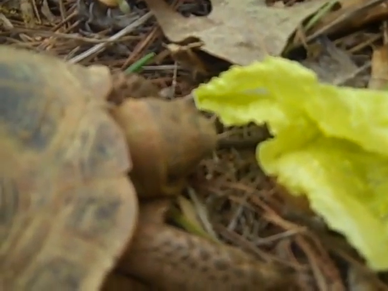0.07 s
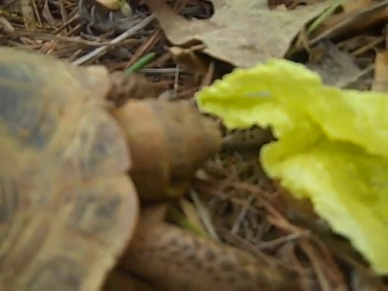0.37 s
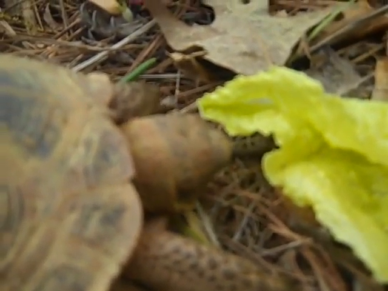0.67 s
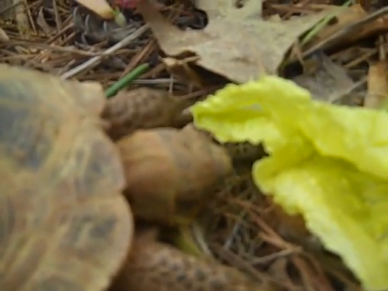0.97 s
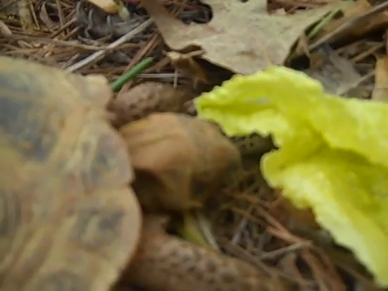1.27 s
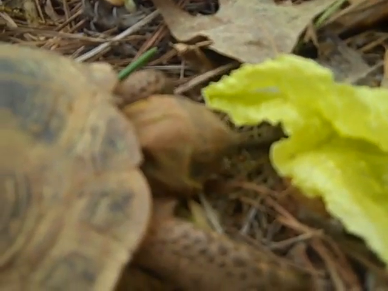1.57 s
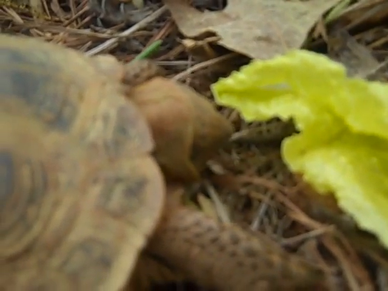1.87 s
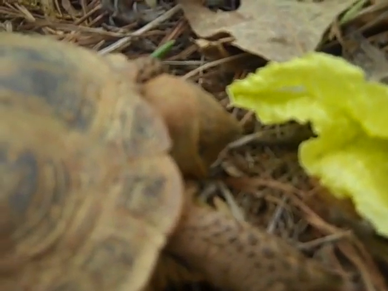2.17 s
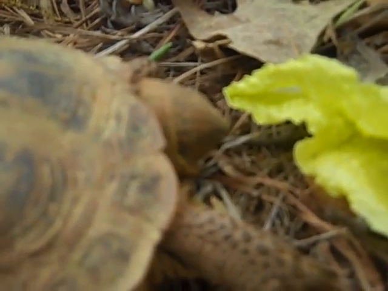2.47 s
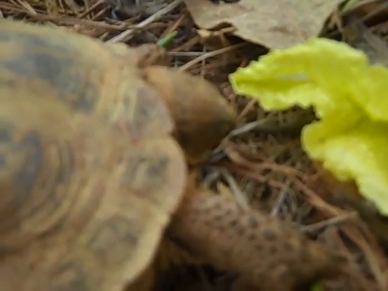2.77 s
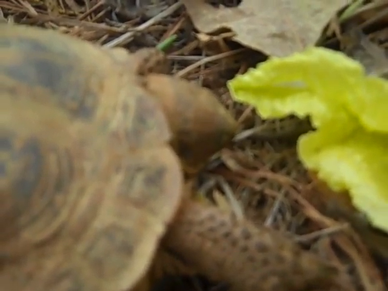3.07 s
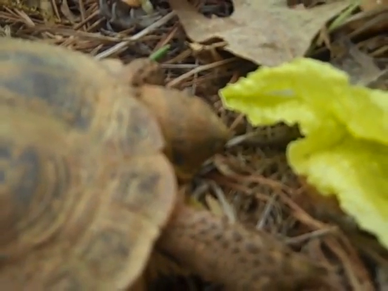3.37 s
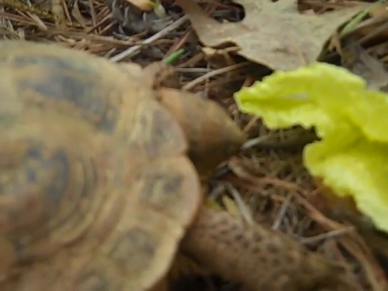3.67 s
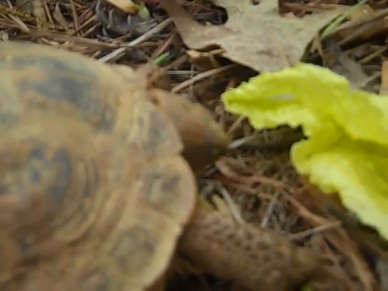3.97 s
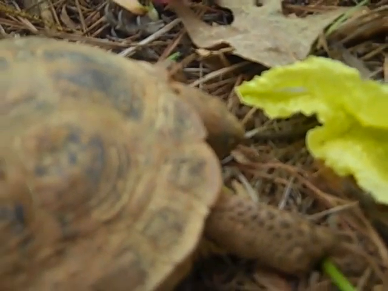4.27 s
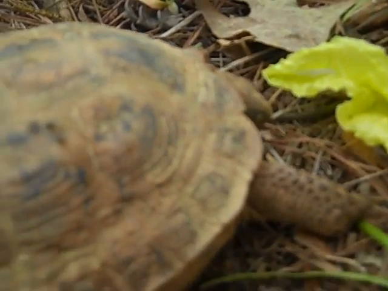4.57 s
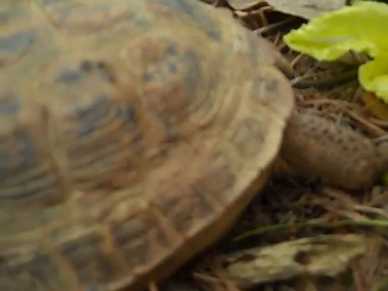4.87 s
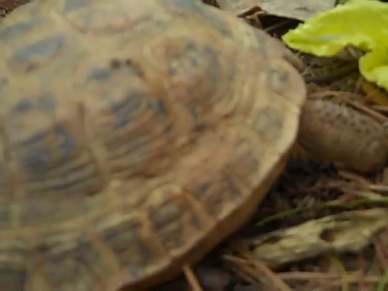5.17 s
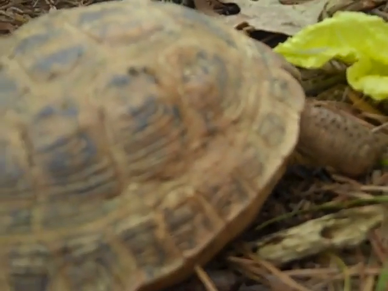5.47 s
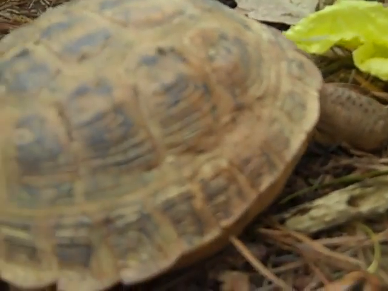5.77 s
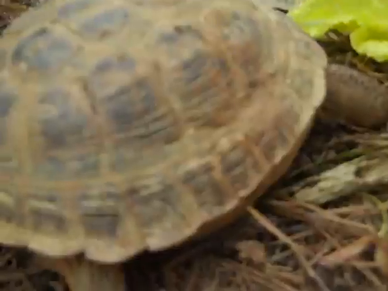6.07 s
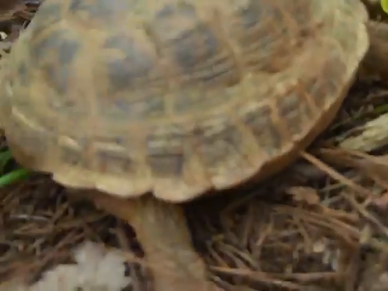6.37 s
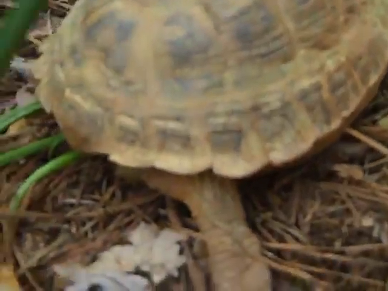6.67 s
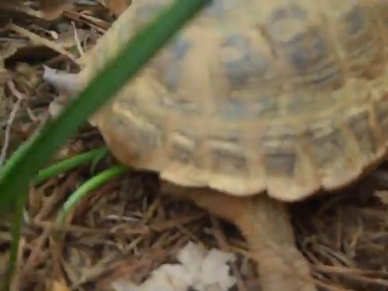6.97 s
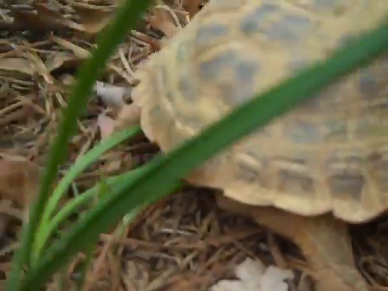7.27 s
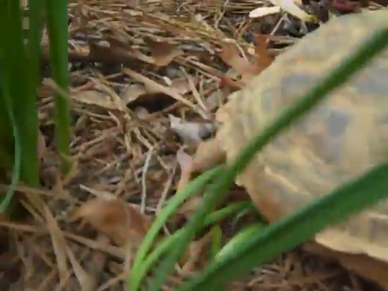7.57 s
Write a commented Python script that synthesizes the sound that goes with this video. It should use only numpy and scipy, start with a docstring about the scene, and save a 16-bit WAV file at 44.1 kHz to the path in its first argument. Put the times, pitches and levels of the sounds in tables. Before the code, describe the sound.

At the quiet edge of a wood, wind bumps and rumbles on the microphone in irregular gusts. A bird starts a rapid, high trill, grows louder and finishes with a few sliding notes, while thin whistles come from distant birds. Nearby, dry needles slide and twigs click under a moving tortoise. After the song, the gusts carry on with scattered light snaps, one short scrape and a few tiny leaf crunches near the end.

```python
"""Tortoise at the edge of a wood

A tortoise shifts over dry pine needles and leaves: needles slide and snap, and leaves crunch.
A songbird sings a swelling trill that ends in slurred notes, and other birds whistle far off,
all gliding sine tones that echo among the trunks. Light gusts buffet the microphone's two ports
with low, lumpy turbulence over a quiet outdoor hush."""
import sys
import numpy as np
from scipy import signal
from scipy.fft import rfft, irfft
from scipy.io import wavfile
from scipy.ndimage import uniform_filter1d

SR = 44100
rng = np.random.default_rng(int(sys.argv[2]) if len(sys.argv) > 2 else 0)


def waveform_to_disk(signal):
    """Save audio, clipped to [-1, 1], as 16-bit WAV at the path in sys.argv[1]."""
    frames = np.transpose(np.atleast_2d(signal))
    scaled = np.clip(frames, -1, 1) * 32767
    samples = np.round(scaled).astype(np.int16)
    wavfile.write(sys.argv[1], SR, samples)


N = 335601
T = np.arange(N) / SR
ENVELOPE_T = T[::20]   # a coarser clock for envelopes

# Levels are set ahead of each layer's fader. Pan is left minus right, so positive leans left.
# The tortoise pushes through the litter. Each row: start in seconds, length in seconds, level in dB.
PUSHES = [(0.022, 0.13, -51.5), (0.442, 0.028, -47.5), (1.16, 0.1, -52), (1.287, 0.29, -53),
          (1.577, 0.43, -55), (2.437, 0.16, -55.5), (4.15, 0.078, -55.5), (4.357, 0.25, -58.5),
          (5.413, 0.28, -58.5), (6.775, 0.048, -56.5), (7.425, 0.021, -53.5)]
# A stiff blade scrapes past. Each row: time in seconds, level in dB.
SCRAPE_ENVELOPE = [(5.53, -82), (5.6, -57), (5.65, -49), (5.675, -46), (5.695, -50), (5.72, -76)]
# The tone of sliding needles. Each row: frequency in Hz, gain in dB.
NEEDLE_EQ = [(800, -24), (2000, -4.5), (3500, -7), (5200, -5), (6600, 4.5), (7900, 1), (9500, -15.5),
             (14500, -18)]
# Needles and twigs snap. Each row: start in seconds, peak in dB, pan in dB, own ring in Hz.
TWIG_SNAPS = [(0.136, -32, 0, 6400), (0.1422, -31, 4, 8600), (0.2572, -29.5, -1, 2000),
              (0.4855, -35, 6, 7000), (0.709, -28.5, -12, 6360), (1.28, -27, -6, 5230),
              (1.3137, -30.5, -2, 7950), (1.341, -29, 0, 5350), (1.4968, -29, 3, 8100),
              (1.504, -21, -2, 6800), (1.6654, -24, -8, 6300), (1.836, -37, 3, 5400),
              (1.8565, -30, -9, 6400), (2.1028, -30, -2, 5240), (2.45, -25.5, 1, 7500),
              (4.158, -38, -2, 5040), (4.4175, -35, 2, 6300), (4.4824, -37, -5, 6700),
              (4.5407, -38, -11, 6400), (4.644, -33.5, -10, 6200), (4.7195, -39, 1, 7800),
              (5.917, -38, -5, 7200)]
# Leaves crushed underfoot. Each row: start in seconds, length in seconds, level in dB, pan in dB.
LEAF_CRUNCHES = [(0.399, 0.0093, -37, 0), (1.486, 0.051, -43, 1), (7.266, 0.0052, -40, 8),
                 (7.279, 0.027, -51, 4), (7.336, 0.011, -47, -7), (7.364, 0.0039, -44.5, -13),
                 (7.394, 0.0078, -46.5, -4)]
# The tone of a breaking leaf. Each row: frequency in Hz, gain in dB.
LEAF_EQ = [(1500, -14.5), (4000, -9.5), (6600, 1), (8200, 0.5), (10500, -18), (14500, -19)]
# One trill syllable, a dip and an upward flick. Each row: offset in seconds, pitch in Hz, level in dB.
TRILL_SYLLABLE = [(-.002, 4134, -7), (.005, 3928, -0.5), (.0105, 3755, -1.5), (.013, 3980, -11),
                  (.016, 4900, -4), (.019, 5100, -8), (.024, 5170, 3), (.029, 5370, 3), (.033, 5400, -12)]
# The trill swells and sags. Each row: time in seconds, level in dB, pitch ratio.
TRILL_EFFORT = [(.767, -57, 1.04), (1.04, -46.5, .99), (1.22, -38.5, 0.97), (1.42, -35, 1.003),
                (1.54, -31.5, 1.01), (1.8, -30.5, 1.006), (2.07, -33, .99), (2.18, -36.5, 0.98),
                (2.238, -42.5, 1.03)]
# The song's slurred ending. Each row: start and length in seconds, first, middle and last pitch in Hz,
# level in dB.
CLOSING_NOTES = [(2.102, 0.087, 4350, 3610, 3290, -45), (2.27, 0.053, 5300, 5000, 4060, -39),
                 (2.344, 0.081, 4520, 3880, 3310, -34.5), (2.493, 0.035, 4900, 5170, 5240, -46),
                 (2.53, 0.046, 5100, 4690, 4010, -33), (2.563, 0.026, 4850, 4840, 4500, -41),
                 (2.6, .062, 4480, 4000, 3410, -30), (2.716, 0.058, 5330, 5010, 4820, -37.5),
                 (2.76, 0.046, 4950, 3790, 3250, -37), (2.803, 0.068, 3600, 3930, 4350, -37),
                 (2.922, 0.034, 5020, 4790, 4630, -42), (2.957, 0.045, 4920, 4750, 4750, -47)]
# Distant birds. Each row: start and end in seconds, first and last pitch in Hz, level in dB.
FAR_CALLS = [(0.451, 0.712, 2217, 1840, -62.5), (0.509, 0.58, 7600, 7630, -51.5),
             (0.966, 1.05, 6620, 5550, -49), (1.071, 1.202, 7610, 7430, -53),
             (1.195, 1.476, 2750, 2286, -58.5), (2.846, 2.917, 7000, 6930, -51.5),
             (5.674, 5.754, 7030, 7350, -51.5), (5.9, 6.06, 6820, 6600, -60)]
# Gusts on the microphone. Each row: start in seconds, length in seconds, level in dB, pan in dB.
WIND_GUSTS = [(0.072, 0.02, -17, -8), (0.16, 0.6, -26, -1), (0.948, 0.046, -32.5, -3.5),
              (1.208, 0.12, -31.5, -21), (1.373, 0.019, -24.5, -6), (1.474, 0.12, -32.5, -1),
              (1.906, 0.15, -36.5, -2.5), (2.342, 0.024, -30, -2), (2.484, 0.11, -12.5, -7),
              (2.6, 0.14, -20.5, -2.5), (2.738, 0.04, -20.5, -0.5), (2.814, 0.14, -22, -5),
              (3.162, 0.12, -28.5, -0.5), (3.474, 0.11, -30, -6), (3.628, 0.16, -23.5, -5),
              (3.823, 0.01, -24, 0), (4.194, 0.012, -36, -20), (4.382, 0.051, -24, 3.5),
              (4.504, .37, -32.5, 1), (5.165, 0.068, -25.5, 8), (5.24, 0.068, -29.5, 3),
              (5.446, 0.045, -30.5, -0.5), (5.697, 0.048, -27.5, 6.5), (5.834, 0.057, -29.5, -5.5),
              (6.123, 0.061, -35, -2), (6.283, 0.18, -43, -6), (6.778, 0.022, -27.5, 5),
              (6.979, 0.17, -28, 6), (7.196, 0.21, -25, 4), (7.469, 0.17, -25.5, -4)]
# The tone of large and of small eddies. Each row: frequency in Hz, gain in dB.
LARGE_EDDY_EQ = [(10, 7.5), (28, 1), (55, 4.0), (100, 3.5), (165, -2.5), (240, -13.5), (330, -20.0),
                 (500, -48.0), (900, -50.0), (3000, -93)]
SMALL_EDDY_EQ = [(60, 23.5), (170, 12.0), (260, 19.5), (400, 13.5), (700, -7), (1200, -34),
                 (3000, -52), (9000, -80)]
# Single eddies hit the ports. Each row: start in seconds, level in dB, pan in dB.
EDDY_HITS = [(0.072, -14.5, -19), (0.092, -7.5, -17), (0.111, -14, 15), (.475, -12, -6), (.711, -16, -9),
             (2.469, -4, -35), (2.505, -3.5, 4), (2.546, -2, 22), (2.558, -2, -2.5), (2.63, -9.5, -22),
             (2.659, -9, 3), (2.754, -8.5, 0), (2.846, -11, 0), (3.649, -13, -27), (3.73, -13, -20),
             (5.186, -12.5, 16), (5.203, -7.5, 8), (5.971, -23.5, 12), (6.122, -21.5, -6),
             (6.176, -20.5, 0), (6.274, -20, -20), (6.794, -20, 17), (7.277, -11, 32), (7.308, -15, 15),
             (7.468, -13.5, 5), (7.541, -11, -8), (7.574, -8, -12)]
# The tone of the hush. Each row: frequency in Hz, gain in dB.
HUSH_EQ = [(25, -5.5), (60, 3.5), (130, -3), (250, -12), (400, -14), (630, -18), (1000, -23.5), (2000, -29),
           (3300, -31.5), (5000, -33), (6400, -28.5), (7800, -29.5), (9500, -37), (14500, -43.5)]
# The hush widens toward the treble. Each row: frequency in Hz, left-right correlation from 0 to 1.
HUSH_CORRELATION = [(50, 1), (300, 1), (700, 0.78), (1500, 0.54), (3000, 0.12), (7000, 0)]
# Each port rings at its own pitch, the right one lower. Each row: frequency in Hz, pan in dB.
PORT_BALANCE = [(3000, 0.5), (5200, -0.5), (6300, -9), (7000, 0), (7700, 7), (8400, 10), (9500, 4),
                (14000, 1)]


def tortoise_rustle(level_db=2, stir_db=-62, pan_db=1):
    """Needles slide under shell and feet, each at its own pitch, and settle between pushes."""
    needles = sum(resonate(crackle(400, spread_db=2.5), hz, hz / 5)
                  for hz in np.geomspace(1800, 13000, 10))
    pushes = sum(swell(*push, attack_s=0.018, release_s=0.045) for push in PUSHES)
    envelope = np.interp(T, ENVELOPE_T, np.sqrt(from_db(stir_db) ** 2 + pushes))
    return panned(from_db(level_db) * envelope * coloured(needles, NEEDLE_EQ), pan_db)


def blade_scrape(ring_hz=7400, width_hz=1200, pan_db=2):
    """A stiff blade scrapes by, close on the left: dense slips through a bright resonance."""
    slips = crackle(3000, spread_db=2)
    ring = resonate(resonate(slips, ring_hz, width_hz), ring_hz, width_hz)
    grit = from_db(-19) * cut(slips, 8000, "low")
    envelope = from_db(np.interp(T, *np.transpose(SCRAPE_ENVELOPE)))
    return panned(envelope * rms_one(ring + grit), pan_db)


def twig_snaps(level_db=1, tail_db=-15, body_db=-1, crack_db=-17, bright_hz=7500):
    """A dry fibre breaks: a sharp crack, a bright ring and a ring of its own set by its length."""
    out, t = np.zeros((2, N)), T[:SR // 25]
    burst, settle = np.exp(-t / .0008), np.exp(-t / .005)
    for start, db, pan_db, own_hz in TWIG_SNAPS:
        noise = rng.standard_normal((3, len(t)))
        wide, centre = noise[:2], noise[2]
        ground_scatter = from_db(tail_db) * settle * wide
        crack = burst * (centre + .5 * wide) + ground_scatter
        ring = resonate(crack, bright_hz, 730) + from_db(body_db) * resonate(crack, own_hz, 600)
        snap = cut(cut(ring + from_db(crack_db) * crack, 1500, "high"), 10500, "low")
        snap /= np.abs(snap).max(axis=1, keepdims=True)
        add(out, start, panned(from_db(db + level_db) * snap, pan_db))
    return out


def leaf_crunches(attack_s=0.0013, release_s=0.0056):
    """A dry leaf gives way under the weight: a short, bright rush of tiny fractures."""
    power = sum(panned(np.sqrt(swell(start, length, db, attack_s, release_s)), pan_db) ** 2
                for start, length, db, pan_db in LEAF_CRUNCHES)
    envelope = np.array([np.interp(T, ENVELOPE_T, np.sqrt(side)) for side in power])
    return envelope * coloured(crackle(12000, spread_db=2), LEAF_EQ)


def trill(start_s=.7766, beat_s=.0519, slowing_s=.000156, syllables=28):
    """One syllable repeats on a gently slowing beat, never quite alike in pitch and weight."""
    out = np.zeros(N)
    times, db, ratio = np.transpose(TRILL_EFFORT)
    for k in range(syllables):
        onset = start_s + k * beat_s + slowing_s * k ** 2 / 2
        jitter = rng.standard_normal((len(TRILL_SYLLABLE), 3)) * [0, 35, 1.3]   # seconds, Hz, dB
        syllable = whistle(TRILL_SYLLABLE + jitter, np.interp(onset, times, ratio))
        add(out, onset, from_db(np.interp(onset, times, db)) * syllable)
    return out


def slurs(level_db=-2, edge_db=-7):
    """The closing notes each bend through one smooth arc of pitch, softer at both ends."""
    out = np.zeros(N)
    u = np.linspace(-1, 1, 15)   # from the start of a note to its end
    for start, length, first_hz, middle_hz, last_hz, db in CLOSING_NOTES:
        bend_hz = (first_hz + last_hz) / 2 - middle_hz
        pitch = middle_hz + u * (last_hz - first_hz) / 2 + u ** 2 * bend_hz
        contour = np.transpose([start + length * (u + 1) / 2, pitch, db + edge_db * u ** 2])
        add(out, start, from_db(level_db) * whistle(contour, waver=0.01))
    return out


def songbird(level_db=-6, pan_db=-7, echo_db=-0.7, echo_pan_db=-3, scatter_hz=3700):
    """The song comes from a tree on the right; foliage scatters its higher notes, so they ring on."""
    song = trill() + slurs()
    direct = np.array([np.roll(song, 3), song])   # reaches the left port a little later
    echoes = from_db(echo_db) * wood_reverb(cut(song, scatter_hz, "high"))
    return from_db(level_db) * (panned(direct, pan_db) + panned(echoes, echo_pan_db))


def far_birds(direct_db=-14, echo_db=-2):
    """Thin, quavering whistles from far off arrive mostly as echoes."""
    calls = np.zeros(N)
    for start, end, first_hz, last_hz, db in FAR_CALLS:
        add(calls, start, whistle([(start, first_hz, db), (end, last_hz, db)], waver=.028))
    return from_db(direct_db) * calls + from_db(echo_db) * wood_reverb(calls)


def airflow(breeze_db=-42.5, breeze_pan_db=-1.5, attack_s=0.0073, release_s=0.056):
    """Level and pan in dB of a light breeze with gusts that arrive faster than they die away."""
    power = panned(from_db(breeze_db), breeze_pan_db) ** 2
    for start, length, db, pan_db in WIND_GUSTS:
        power = power + panned(1.0, pan_db) ** 2 * swell(start, length, db, attack_s, release_s)
    level, balance = power.mean(axis=0), power[0] / power[1]
    return [np.interp(T, ENVELOPE_T, 10 * np.log10(curve)) for curve in (level, balance)]


def wind(lump_db=4, fine_db=-19, reference_db=-22, shared=0.34):
    """Lumpy turbulence rumbles at each port; stronger gusts shed more fine eddies."""
    db, pan_db = airflow()
    white = rng.standard_normal((3, N))
    rumble = coloured(white[:2] + shared * white[2], LARGE_EDDY_EQ)
    rumble /= np.sqrt(uniform_filter1d(rumble ** 2, SR // 20, axis=1))   # evened out, so gusts lead
    fine = from_db(fine_db + db - reference_db) * coloured(rng.standard_normal((2, N)), SMALL_EDDY_EQ)
    lumps = from_db(lump_db * np.array([drift(45), drift(45)]))
    return panned(from_db(db) * lumps * (rumble + fine), pan_db)


def buffets(level_db=-2, swing_hz=185, quickening=0.13, hiss_db=-16, hiss_hz=720, brightening=0.71):
    """An eddy passes a port as one ragged swing of pressure, quicker and brighter when it is strong."""
    out, t = np.zeros((2, N)), T[:SR // 25]
    for start, db, pan_db in EDDY_HITS:
        detune = 2 ** rng.uniform(-0.25, 0.43, (2, 1))
        cycles = t * swing_hz * from_db(quickening * db) * detune
        envelope = (cycles / .8) ** 4 * np.exp(4 - 5 * cycles)
        cutoff_hz = hiss_hz * from_db(brightening * db)
        ragged = rms_one(cut(rng.standard_normal((2, len(t))), cutoff_hz, "low", order=4))
        pressure = from_db(hiss_db) * ragged - np.sin(2 * np.pi * cycles)
        add(out, start, panned(from_db(db + level_db) * envelope * pressure, pan_db))
    return out


def hush(level_db=-43, waver_db=.5):
    """A steady bed of distant air and foliage, centred in the bass and diffuse in the treble."""
    alike = np.clip(per_bin(HUSH_CORRELATION), -.99, .99)
    mid, side = rfft(rng.standard_normal((2, N)))
    air = irfft(np.sqrt(1 + alike) * mid + np.sqrt(1 - alike) * side * [[1], [-1]], N)
    return from_db(level_db + waver_db * drift(7)) * coloured(air, HUSH_EQ)


def wood_reverb(x, t60_s=0.72, early_s=0.012, early_db=1.5):
    """Trunks scatter a quick cluster of echoes and a longer tail, different at each port."""
    t = T[:SR]
    decay = from_db(-60 * t / t60_s) + from_db(early_db) * np.exp(-t / early_s)
    echoes = rng.standard_normal((2, SR)) * decay
    echoes /= np.sqrt(np.sum(echoes ** 2, axis=1, keepdims=True))
    return signal.fftconvolve(x[None], echoes, axes=1)[:, :N]


def crackle(per_s, spread_db):
    """Tiny slips of uneven size come in clumps and reach each port with their own strength."""
    at = np.flatnonzero(rng.random(N) < per_s * from_db(5 * drift(40)) / SR)
    sizes = from_db(spread_db * np.minimum(rng.exponential(1, len(at)), 3))
    slips = np.full((2, N), 1e-18)
    slips[:, at] = sizes * rng.standard_normal((2, len(at)))
    return slips


def whistle(contour, ratio=1, waver=0.0091, flutter_db=0.5, fade_s=0.0048):
    """A near-pure note glides along its contour, wavering in pitch and strength."""
    times, hz, db = np.transpose(contour)
    t = np.arange(times[0], times[-1], 1 / SR)
    wobble, flutter = (np.interp(t * 250, np.arange(2000), row) for row in rng.standard_normal((2, 2000)))
    pitch = np.interp(t, times, hz) * ratio * (1 + waver * wobble)
    level = from_db(np.interp(t, times, db) + flutter_db * flutter)
    fades = np.clip(np.minimum(t - t[0], t[-1] - t) / fade_s, 0, 1)
    return np.sqrt(2) * fades * level * np.sin(2 * np.pi * np.cumsum(pitch) / SR)


def swell(start, length, db, attack_s, release_s):
    """The power of a sound that rises, holds for its length and dies away."""
    before = np.maximum(start - ENVELOPE_T, 0) / attack_s
    after = np.maximum(ENVELOPE_T - start - length, 0) / release_s
    return (from_db(db) * np.exp(-np.minimum(before + after, 20))) ** 2


def drift(per_s):
    """A smooth random wander of spread 1."""
    knots = rng.standard_normal(N // 40)
    return np.interp(T * per_s, np.arange(len(knots)), knots) / np.sqrt(2 / 3)


def resonate(x, hz, width_hz):
    """A resonance with unity gain at its peak."""
    r = np.exp(-np.pi * width_hz / SR)
    feedback = [1, -2 * r * np.cos(2 * np.pi * hz / SR), r * r]
    return signal.lfilter(np.array([1, 0, -1]) * (1 - r * r) / 2, feedback, x)


def coloured(x, eq):
    """Shape a steady signal with an EQ curve and bring it to rms 1."""
    return rms_one(irfft(rfft(x) * from_db(per_bin(eq)), N))


def per_bin(curve):
    """Read a curve at every FFT bin, on a log frequency scale."""
    hz, values = np.transpose(curve)
    return np.interp(np.log(np.arange(N // 2 + 1) * SR / N + 1), np.log(hz), values)


def panned(x, pan_db):
    """Share the power between left and right."""
    gain = from_db(np.array([[.5], [-.5]]) * pan_db)
    return x * gain / np.sqrt(np.mean(gain ** 2, axis=0))


def cut(x, hz, kind, order=2):
    """A low-pass or high-pass filter."""
    return signal.sosfilt(signal.butter(order, hz, kind, fs=SR, output="sos"), x)


def add(out, start_s, x):
    """Drop a short sound into the mix."""
    i = max(round(start_s * SR), 0)
    out[..., i:i + x.shape[-1]] += x[..., :N - i]


def from_db(db):
    return 10 ** (np.asarray(db) / 20)


def rms_one(x):
    return x / np.sqrt(np.mean(x ** 2) + 1e-20)


def scene():
    """Birds, tortoise and moving air in one stereo mix."""
    birds = songbird() + far_birds()
    tortoise = twig_snaps() + leaf_crunches() + tortoise_rustle() + blade_scrape()
    return birds + tortoise + hush() + wind() + buffets()


def record(dry, low_cut_hz=27, ceiling=.9, high_cut_hz=14400):
    """The ports colour the treble, the strongest gusts are rounded off, and both extremes are cut."""
    heard = irfft(panned(rfft(dry), per_bin(PORT_BALANCE)), N)
    rounded = ceiling * np.tanh(cut(heard, low_cut_hz, "high") / ceiling)
    return signal.sosfilt(signal.ellip(10, .2, 80, high_cut_hz, fs=SR, output="sos"), rounded)


dry = scene()
out = record(dry)
waveform_to_disk(out)
```